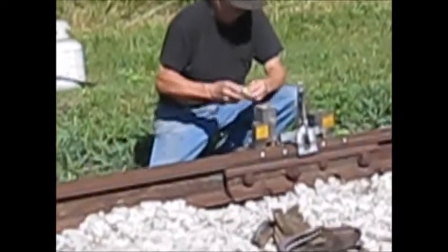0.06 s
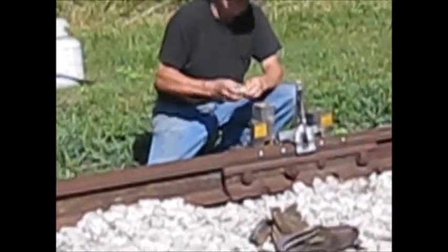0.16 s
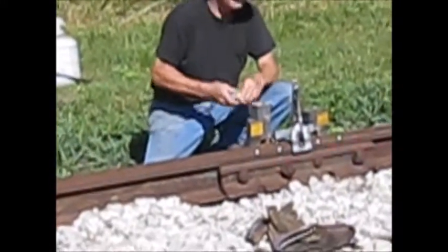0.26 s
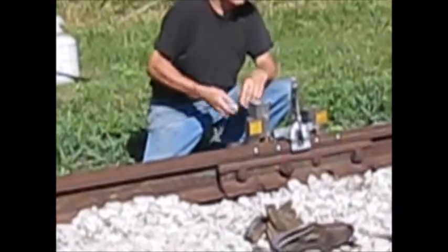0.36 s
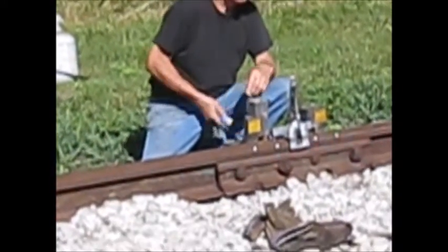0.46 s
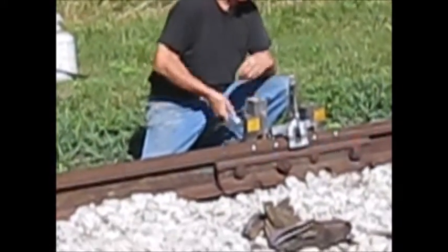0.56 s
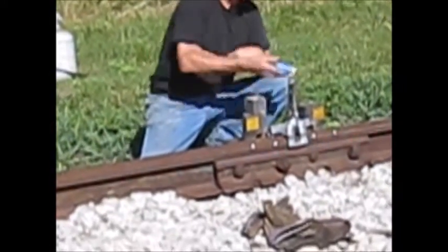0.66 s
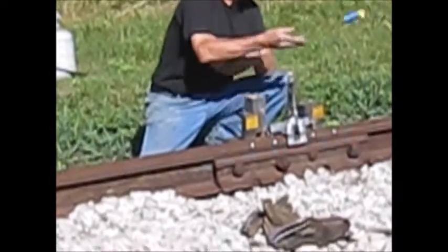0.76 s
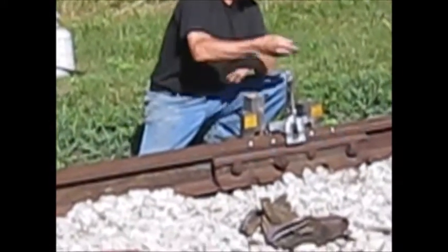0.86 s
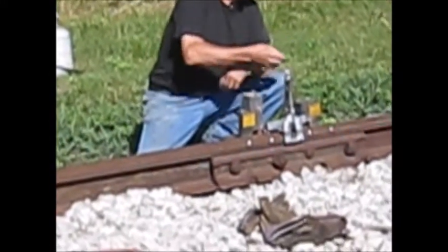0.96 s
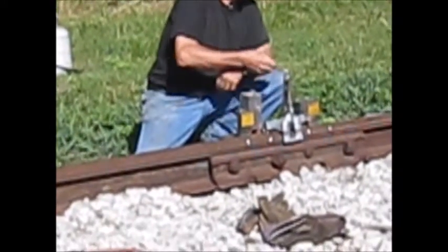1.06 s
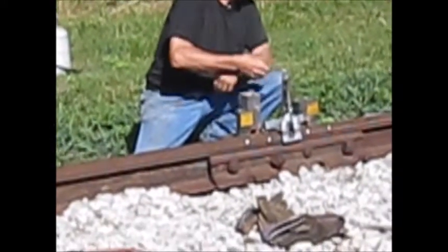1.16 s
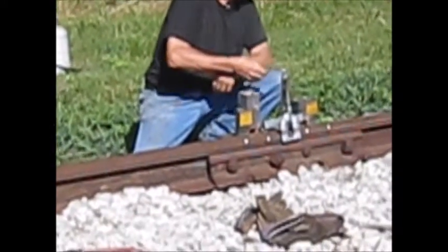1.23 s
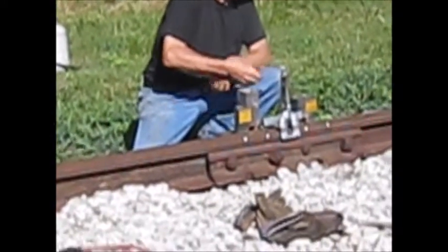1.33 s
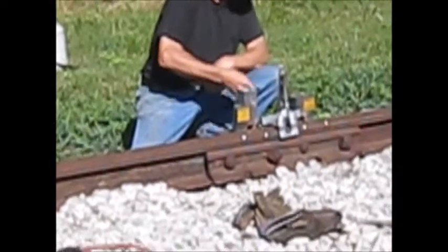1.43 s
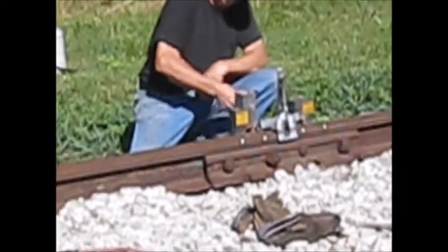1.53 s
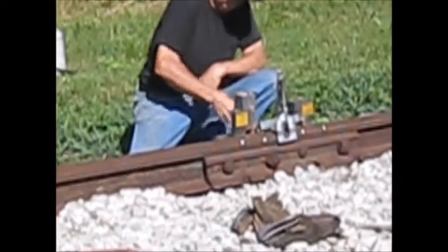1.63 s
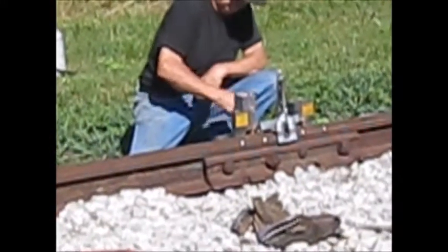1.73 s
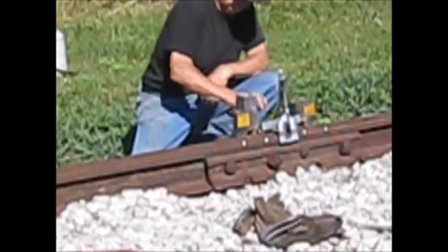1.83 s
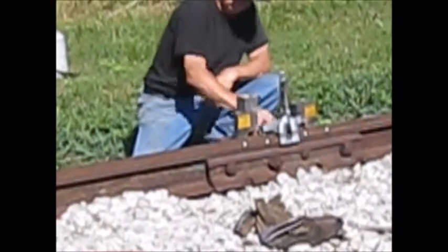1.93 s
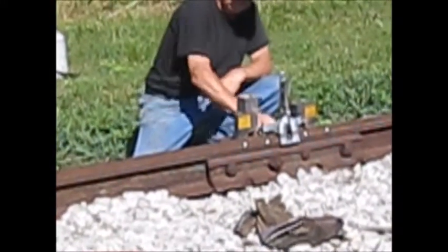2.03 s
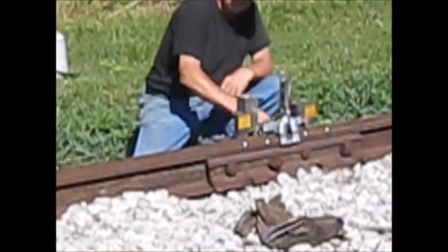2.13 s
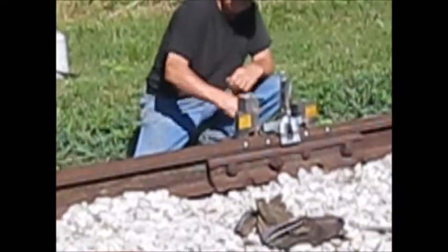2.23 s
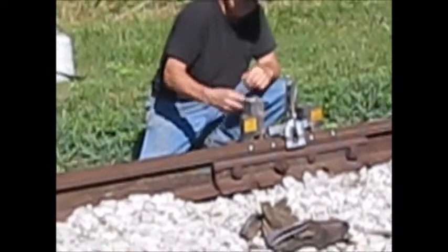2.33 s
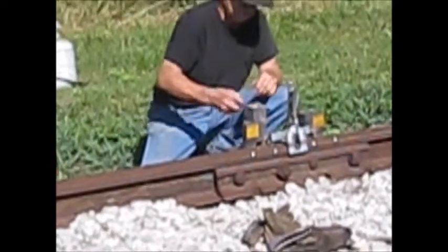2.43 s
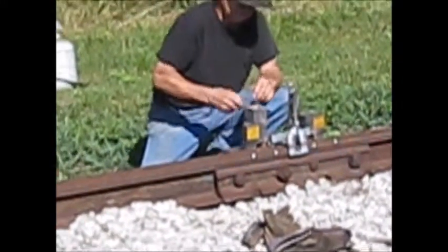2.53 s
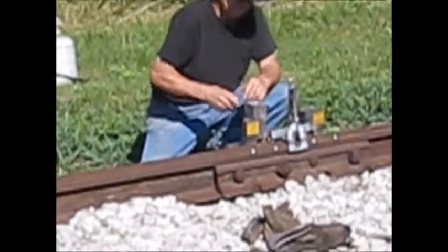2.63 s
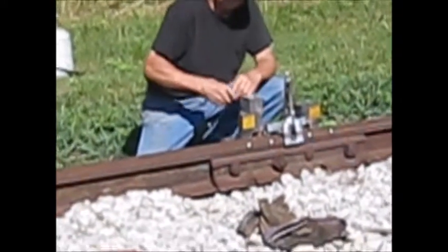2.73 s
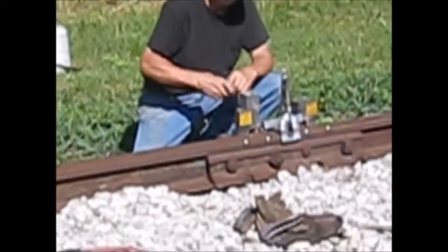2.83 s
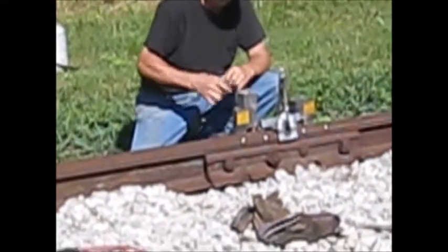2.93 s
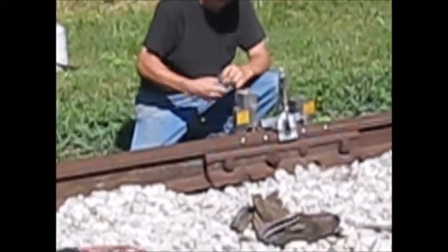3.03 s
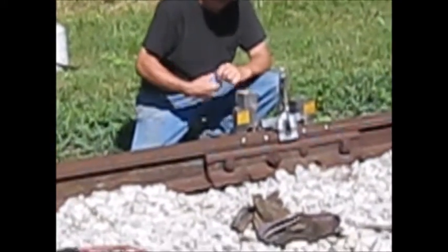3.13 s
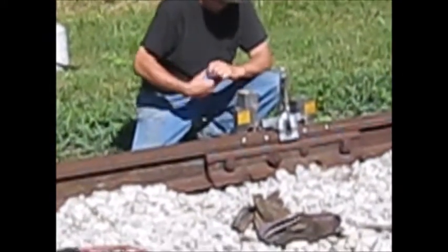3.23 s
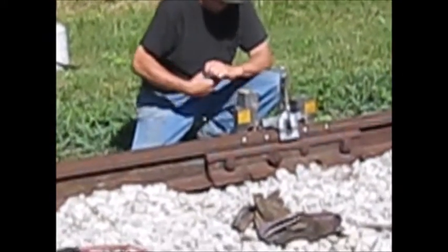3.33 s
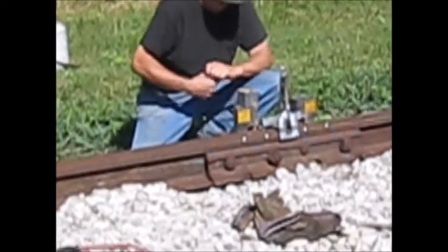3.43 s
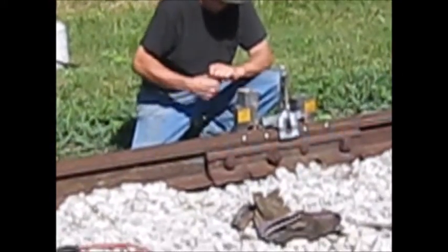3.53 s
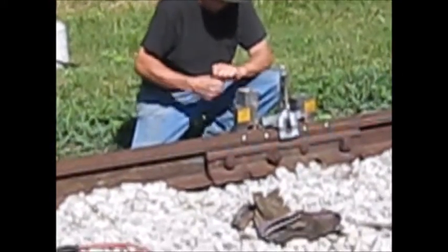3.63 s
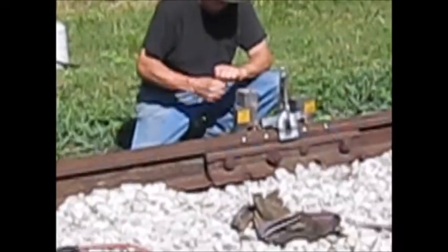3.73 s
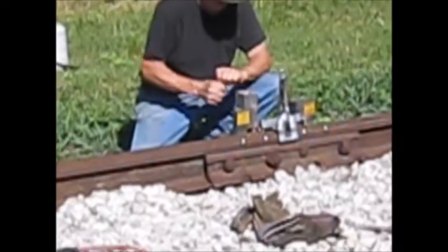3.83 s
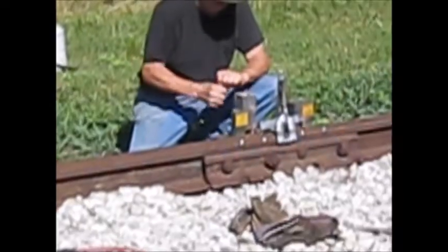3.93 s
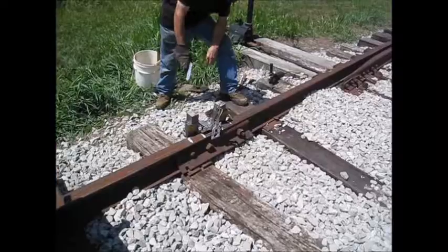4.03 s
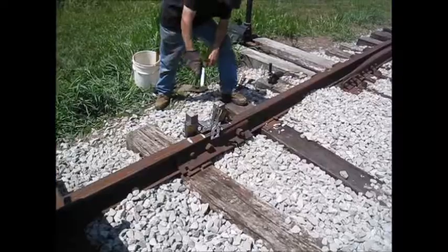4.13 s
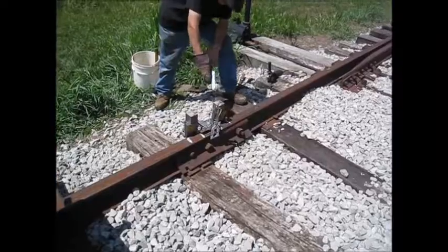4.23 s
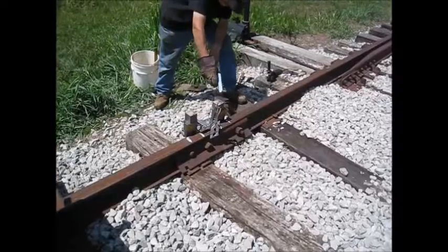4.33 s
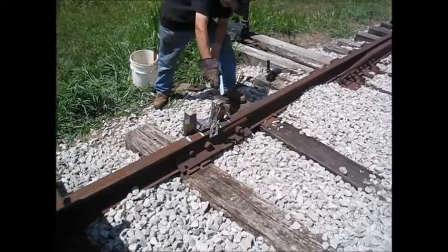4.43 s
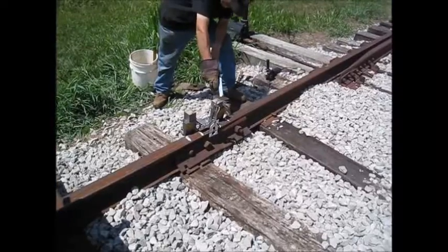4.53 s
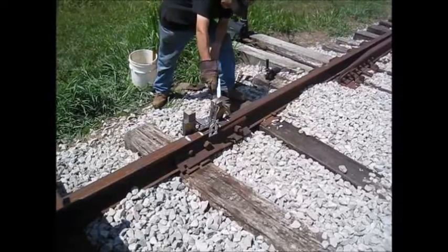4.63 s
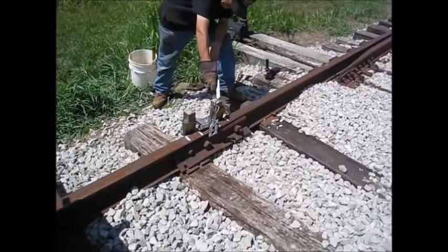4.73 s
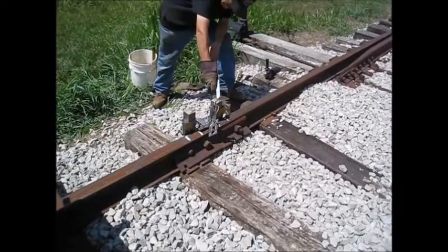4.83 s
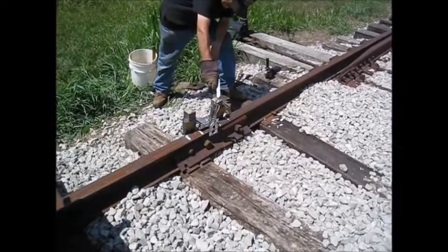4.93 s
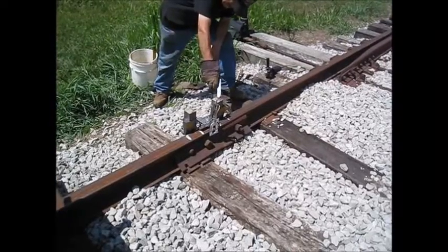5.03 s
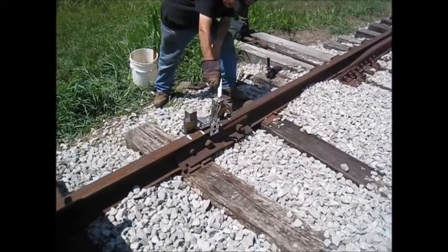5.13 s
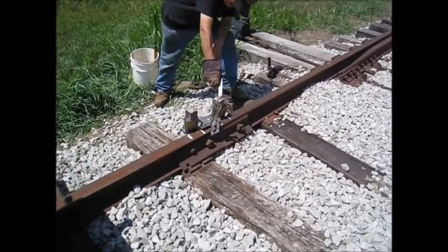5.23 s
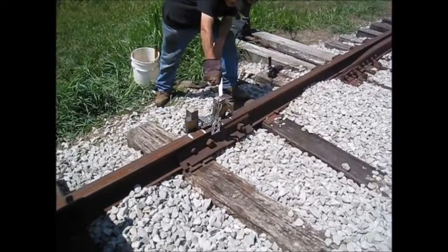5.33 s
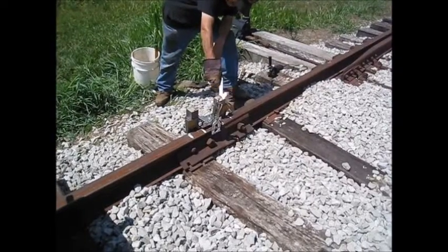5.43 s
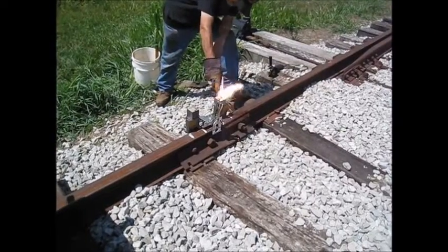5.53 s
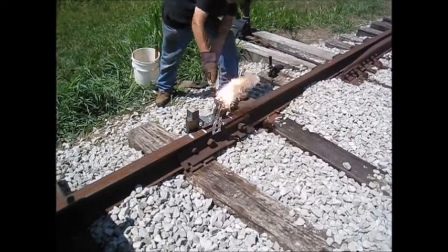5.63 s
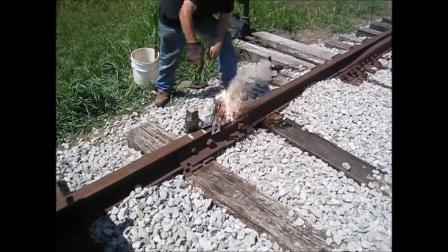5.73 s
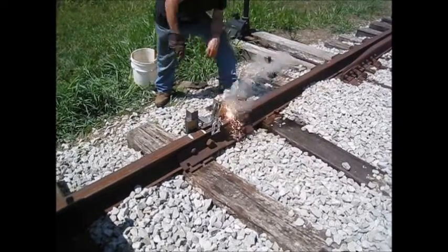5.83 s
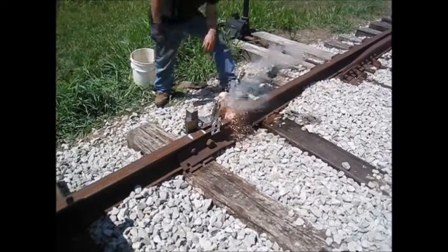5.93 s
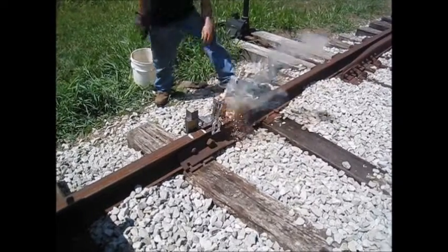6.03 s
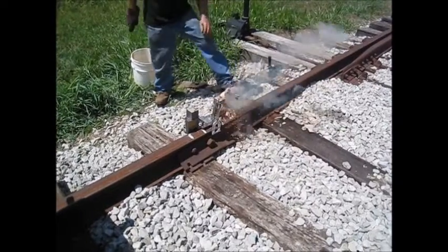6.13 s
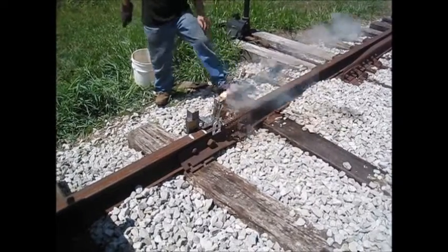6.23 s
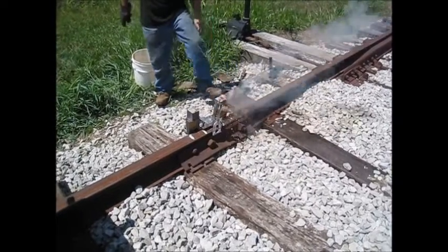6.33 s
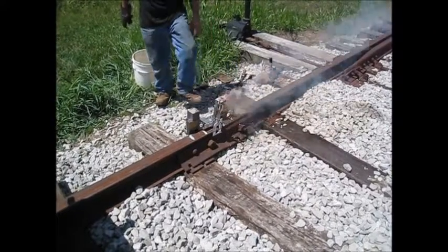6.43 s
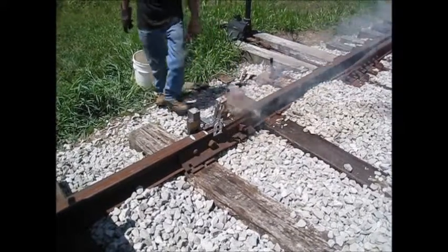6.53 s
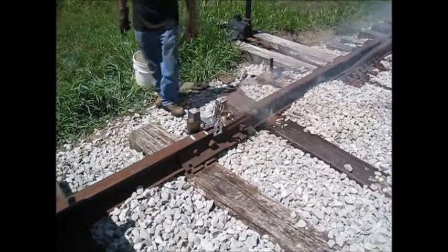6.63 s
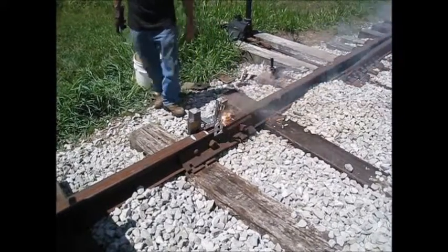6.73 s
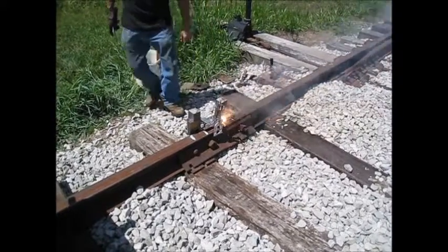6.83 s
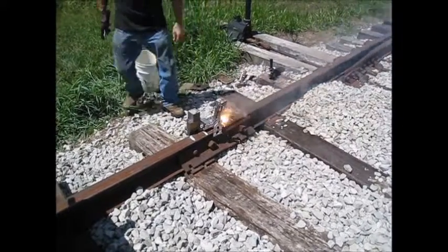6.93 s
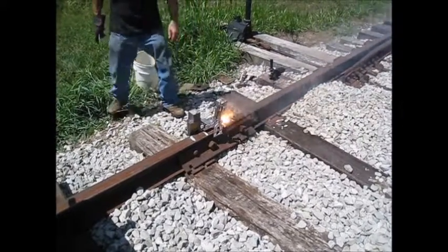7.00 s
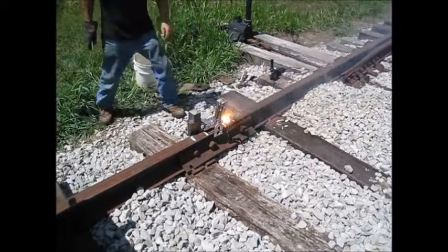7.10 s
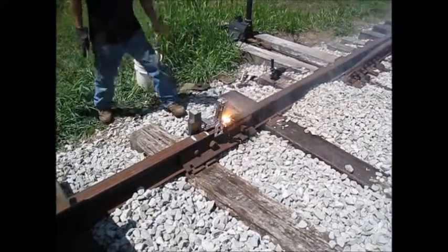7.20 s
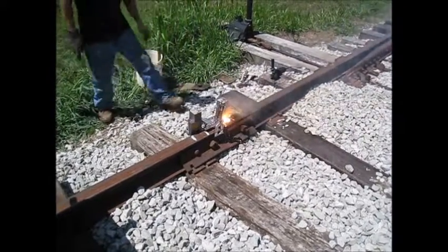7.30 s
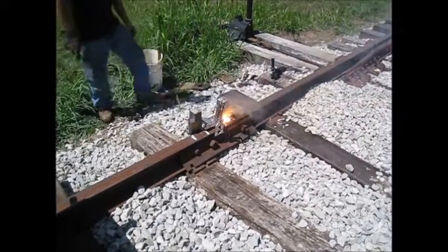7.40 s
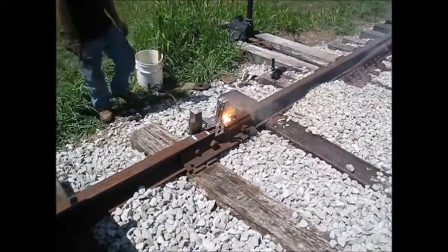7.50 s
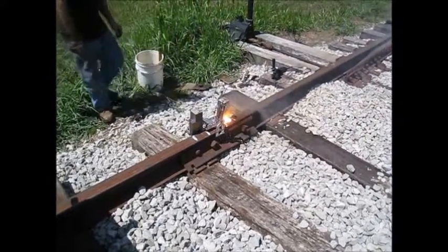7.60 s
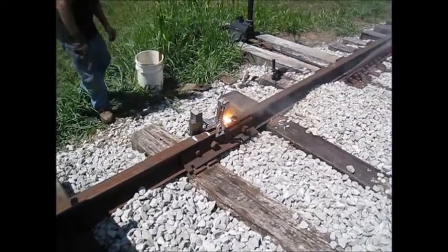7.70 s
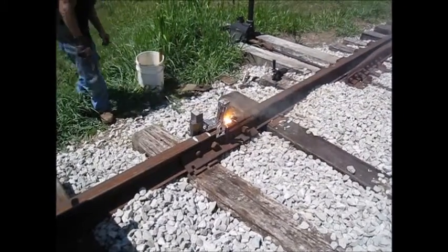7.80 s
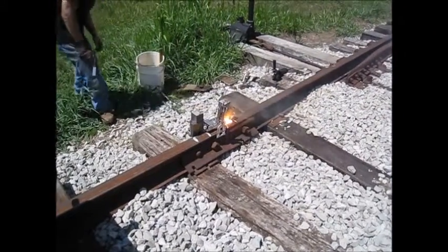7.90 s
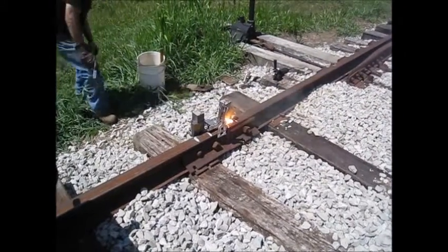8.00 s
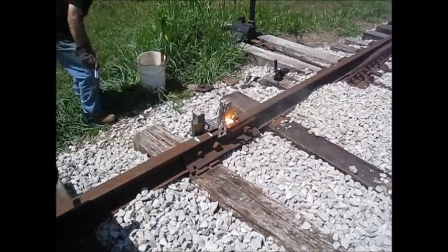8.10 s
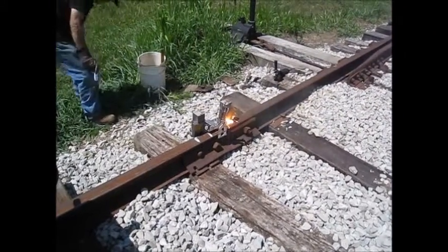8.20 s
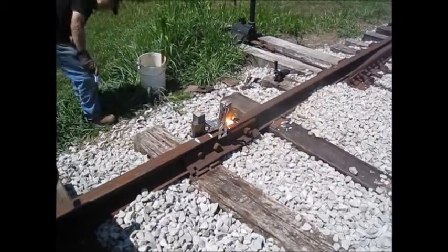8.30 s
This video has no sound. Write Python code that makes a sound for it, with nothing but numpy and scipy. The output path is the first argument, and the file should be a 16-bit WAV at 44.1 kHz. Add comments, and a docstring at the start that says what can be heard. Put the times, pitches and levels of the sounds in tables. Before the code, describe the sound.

For four seconds only a camera's faint motor hum, thin whine, hiss and soft bumps. A tick cuts abruptly to a trackside field with a distant droning engine and raspy insects. A flint igniter snaps four times, the third hardest; powder flares into a loud roaring, fizzing jet for just over a second, pops and stops. Boots clack stones and brush grass. Mono, the loud sounds squashed by the microphone.

```python
"""Thermite charge on a rail

A camera's motor hums, whines and buzzes alone: steady sines over shaped hiss, soft bumps and rumble.
Then the outdoors cuts in with a tick: an engine drones in sine orders, three insects rasp and whistle.
A flint igniter snaps four times in noise bursts with a ringing spring, and the snaps are limited.
Powder in a mould burns for just over a second as roaring, jetting and fizzing noise.
Boots clack ballast stones and brush through grass."""
import sys
import numpy as np
from scipy import signal
from scipy.fft import rfft, irfft
from scipy.io import wavfile
from scipy.ndimage import uniform_filter1d

SR = 44100
rng = np.random.default_rng(int(sys.argv[2]) if len(sys.argv) > 2 else 0)


def transcribe(signal):
    """Save signal, clipped to [-1, 1], as a 16-bit WAV file at the path in sys.argv[1]."""
    frames = np.atleast_2d(signal).T
    limited = np.clip(frames, -1, 1)
    pcm = np.round(limited * 32767).astype(np.int16)
    wavfile.write(sys.argv[1], SR, pcm)


N = 368676
T = np.arange(N) / SR


def undb(db):
    """Decibels to gain."""
    return 10 ** (np.asarray(db) / 20)


def unit(x):
    """Scale to rms 1."""
    return x / np.sqrt(np.mean(x ** 2))


def noise():
    """White noise for the whole length."""
    return rng.standard_normal(N)


def colour(x, points):
    """Shape a spectrum by (frequency [Hz], level [dB]) points, joined on a log-frequency axis; rms 1."""
    hz, db = np.transpose(points)
    bins_hz = np.maximum(np.fft.rfftfreq(len(x), 1 / SR), 1)
    gain = undb(np.interp(np.log(bins_hz), np.log(hz), db))
    return unit(irfft(rfft(x) * gain, len(x)))


def band(x, hz, q):
    """A resonance applied twice, for steep skirts; rms 1."""
    b, a = signal.iirpeak(hz, q, fs=SR)
    once = signal.lfilter(b, a, x)
    return unit(signal.lfilter(b, a, once))


def walk(rate):
    """Slow chance: random levels held 1 / rate s and slewed twice; rms 1."""
    k = max(int(SR / rate), 1)
    held = np.repeat(rng.standard_normal(N // k + 1), k)
    slewed = uniform_filter1d(uniform_filter1d(held, k), k)
    return unit(slewed[:N])


def fade(t, t60):
    """Exponential decay: 60 dB in t60 s, full level before t = 0."""
    return np.exp(-np.log(1000) * np.maximum(t, 0) / t60)


def add(out, s, sound):
    """Mix a sound in at time s."""
    i = int(s * SR)
    out[i:i + len(sound)] += sound[:N - i]


def lines(table, turn):
    """Steady sines at random phases, from (frequency [Hz], level [dB rms]) rows."""
    return sum(undb(db) * np.sqrt(2) * np.sin(2 * np.pi * (hz * turn + rng.random())) for hz, db in table)


# motor hum before its level drops: (frequency [Hz], level [dB rms])
MOTOR_HUM = [(59.6, -46), (119.2, -66.5), (178.8, -60.5), (204, -71.5), (297.9, -73)]
# motor whine: (frequency [Hz], level [dB rms])
MOTOR_WHINE = [(1017.2, -69), (1986.8, -74.5), (2034.5, -71), (2309.5, -73.5), (2980, -77.5),
               (3051.8, -73.5), (4069, -77), (4619, -75), (4967, -75), (5086, -78), (6104, -76.5),
               (6928, -73.5), (7121, -77.5), (8138, -77.5), (8941, -82), (9238, -76), (10172, -80.5),
               (11881, -80.5), (12812, -76), (13114, -81), (13916, -87), (15122, -85)]
# spectrum of the microphone hiss: (frequency [Hz], relative level [dB per Hz])
MIC_HISS = [(53, -9), (90, -6), (248, -21), (922, -26), (1000, -25), (1100, -27), (2000, -29),
            (6550, -33.5), (7140, -29), (7610, -38), (9240, -30), (11000, -43.5), (15500, -33)]
HUM_DROP_S = 4.2  # time when the motor hum drops in level
# the rumble holds, then dies down to a resting level
RUMBLE_DB, RUMBLE_HOLD_S, RUMBLE_T60_S, RUMBLE_REST_DB = -50.5, .3, 0.66, -68.5


def camera(late_hum_db=-7, hiss_db=-55.5, bump_db=-55, bump_t60=0.15):
    """Motor hum and whine share one speed wander; shaped noise gives hiss, drive bumps and a dying rumble."""
    turn = T + np.cumsum(0.000298 * walk(6)) / SR
    hum = lines(MOTOR_HUM, turn) * undb(np.where(T < HUM_DROP_S, 0, late_hum_db))
    whine = lines(MOTOR_WHINE, turn)

    rumble = colour(noise(), [(15, -8), (50, 0), (170, -5), (330, -14), (700, -30), (2000, -55)])
    dying = undb(RUMBLE_DB) * fade(T - RUMBLE_HOLD_S, RUMBLE_T60_S)
    rumble = rumble * (dying + undb(RUMBLE_REST_DB)) * undb(1.8 * walk(22))

    since_bump = (T - .19) % .2515  # s
    bumps = colour(noise(), [(60, -18), (180, -1), (400, -5), (1000, -12), (2500, -37)])
    bumps = bumps * fade(since_bump, bump_t60) * np.minimum(since_bump / 0.0043, 1)
    bumps = bumps * undb(bump_db + 2 * walk(3.6))
    return hum + bumps + rumble + whine + undb(hiss_db) * colour(noise(), MIC_HISS)


BUZZ_HZ = 169.55


def buzz(db=-66, corner_hz=2000, scatter=.25):
    """The small motor's buzz: an even comb of weak partials between the lines of its whine."""
    partials_hz = [BUZZ_HZ * k for k in range(2, 28) if k % 6]
    comb = 0
    for hz in partials_hz:
        phase = scatter * rng.random()  # cycles
        comb = comb + np.sin(2 * np.pi * (hz * T + phase)) / np.hypot(1, hz / corner_hz)
    return undb(db) * unit(comb)


# engine speed before jitter: (time [s], firing rate [per s])
ENGINE_SPEED = [(4.1, 31.14), (5.1, 31.14), (6.8, 31.04), (8.3, 31.04)]
# strongest engine orders before their slight wander: (multiple of firing rate, level [dB rms])
ENGINE_ORDERS = [(2, -77), (6, -59), (10, -57.5), (11, -52), (13, -57), (14, -52), (15, -50), (16, -59),
                 (18, -53.5), (19, -50), (20, -47.5), (21, -51.5), (22, -52.5), (23, -47.5), (24, -60),
                 (25, -45), (26, -49.5), (28, -53), (29, -47), (31, -46.5), (32, -45), (33, -46), (34, -45),
                 (36, -56), (37, -44), (39, -50), (40, -44.5), (41, -44.5), (42, -35.5), (43, -38.5),
                 (45, -47), (47, -45), (48, -51), (49, -43.5), (61, -44), (62, -51)]
# spectrum of the loose clatter: (frequency [Hz], relative level [dB per Hz])
CLATTER_COLOUR = [(60, -45), (110, -28), (200, -15), (350, -11.5), (700, -7.5), (1000, -3), (1300, 0),
                  (1520, 1), (1700, -5), (1900, -4), (2300, -6.5), (2800, -12), (4200, -23), (7000, -34.5)]


def engine(knock_db=-39, clatter_db=-30.5, throb=0.081, jitter=0.00099):
    """A small four-stroke some way off: exhaust orders, a valve knock repeated each cycle, loose clatter."""
    speed = np.interp(T, *np.transpose(ENGINE_SPEED)) * (1 + jitter * walk(14))
    cycle = np.cumsum(speed) / SR
    # distance and echoes scatter the phases, so the firings blur into a drone
    tones = 0
    for order, db in ENGINE_ORDERS:
        tone = np.sqrt(2) * np.sin(2 * np.pi * (order * cycle + rng.random()))
        tones = tones + undb(db + 0.14 * walk(7)) * tone

    grain = rng.standard_normal(int(SR / ENGINE_SPEED[0][1]))
    one_cycle = colour(grain, [(1400, -25), (1850, 0.5), (2300, 2.5), (2900, -6), (5000, -25.5)])
    knock = np.interp(cycle % 1, np.linspace(0, 1, len(one_cycle)), one_cycle)

    clatter = colour(noise(), CLATTER_COLOUR) * undb(0.67 * walk(25))
    clatter = clatter * (1 + throb * np.cos(2 * np.pi * cycle))
    return tones + undb(knock_db) * knock + undb(clatter_db) * clatter


def insect(rate, hz, drop_hz, width_hz, db, duty):
    """Each wing stroke is a short rasping whistle that falls in pitch."""
    stroke = np.cumsum(rate * (1 + 0.031 * walk(12))) / SR % 1
    along = np.minimum(stroke / duty, 1)
    pitch = hz + drop_hz * (.5 - along) + width_hz * walk(1500)
    song = np.sin(np.pi * along) * np.sin(2 * np.pi * np.cumsum(pitch) / SR)
    return unit(song) * undb(db + 2.6 * walk(15))


# spectrum of the open air: (frequency [Hz], relative level [dB per Hz])
FIELD_AIR = [(2500, -13), (4000, 0), (5000, 0.5), (6000, 2.5), (6800, 0.5), (7800, 4.5), (8800, -2.5),
             (9800, -8), (12000, -6.5), (15500, -12)]


def meadow(air_db=-39.0):
    """Three insects over the even hiss of the field."""
    near = insect(rate=53.5, hz=7510, drop_hz=840, width_hz=170, db=-43.5, duty=1.0)
    second = insect(rate=22.0, hz=8200, drop_hz=607, width_hz=310, db=-49, duty=0.97)
    third = insect(rate=18.7, hz=9100, drop_hz=104, width_hz=140, db=-56.0, duty=0.38)
    return near + second + third + undb(air_db) * colour(noise(), FIELD_AIR)


def knocks(table, q, rise_s):
    """Short blows, each dying away in one broad resonance."""
    out, t = np.zeros(N), T[:SR // 3]
    for s, db, hz, t60 in table:
        shape = fade(t - rise_s, t60) * np.minimum(t / rise_s, 1)
        blow = band(rng.standard_normal(len(t)), hz, q) * shape
        # give every blow the energy of its envelope, whatever the noise draw
        level = np.sqrt(np.sum(shape ** 2) / np.sum(blow ** 2))
        add(out, s, undb(db) * blow * level)
    return out


# sharp small knocks, the cut's tick first: (time [s], level [dB], resonance [Hz], t60 [s])
SHARP_KNOCKS = [(4.0247, -18.5, 2420, 0.0055), (6.715, -27, 3600, 0.057), (6.956, -20, 3520, 0.012),
                (7.097, -28, 3500, .025), (7.315, -20, 4160, 0.023), (7.326, -22.5, 3900, .025),
                (7.444, -24.5, 5000, 0.018), (7.462, -26, 4800, .02), (7.5122, -8, 4270, 0.008)]
# short tick as the outdoor sound cuts in, same columns
CUT_TICK = SHARP_KNOCKS[:1]


def cut_tick():
    """A very short noise blow in one broad resonance."""
    return knocks(CUT_TICK, q=1.4, rise_s=.0002)


# soft low thumps: (time [s], level [dB], resonance [Hz], t60 [s])
LOW_THUMPS = [(5.078, -34.5, 119, 0.14), (5.152, -38, 90, 0.13), (5.328, -25, 160, .04),
              (5.47, -32.5, 110, 0.15), (5.603, -29.5, 167, 0.1), (5.98, -38, 109, .25),
              (6.46, -40, 150, .12), (6.697, -41, 110, .12), (7.285, -38, 100, .14)]


def thumps():
    """Low noise blows with a soft onset and one broad resonance each."""
    return knocks(LOW_THUMPS, q=0.97, rise_s=0.0031)


# igniter snaps: (time [s], level [dB], scrape length [s], t60 [s],
#                 ring frequency [Hz], relative ring level [dB], relative spring level [dB])
FLINT_SNAPS = [(5.101, -4, 0.00058, 0.015, 13400, -4.5, -44), (5.2314, -6, 0.00078, 0.025, 2830, -9.5, -22),
               (5.3276, 5, 0.0037, 0.027, 7200, -6.5, -14.5), (5.4736, -4, 0.00098, 0.039, 4840, -5.5, -22)]
# spectrum of the scrape: (frequency [Hz], relative level [dB per Hz])
FLINT_COLOUR = [(60, -5), (250, -13), (600, -7), (1200, -10), (2000, -4), (3000, 3.5), (4200, -1.5),
                (9000, -1.5), (11000, 1.5), (14000, 1.5), (16000, 5)]
# modes of the steel spring: (frequency [Hz], relative level [dB], t60 [s])
SPRING_MODES = [(2560, 3, 0.11), (2660, -8, .06), (6067, -16, 0.22), (7440, -17.5, 0.066), (8400, -16, .06),
                (10200, -18, .2), (11940, -17, 0.2)]
SNAP_TAIL_S = .1  # t60 of the ballast's scatter


def igniter(tail_db=-20):
    """Flint scrapes steel for up to a few milliseconds; the spring rings and the ballast scatters the snap."""
    out, t = np.zeros(N), T[:SR // 4]
    spring = sum(undb(db) * np.sin(2 * np.pi * hz * t) * fade(t, t60) for hz, db, t60 in SPRING_MODES)
    for s, db, scrape, t60, hz, ring_db, spring_db in FLINT_SNAPS:
        grit, ring = rng.standard_normal((2, len(t)))
        rasp = colour(grit, FLINT_COLOUR) + undb(ring_db) * band(ring, hz, q=2.5)
        shape = fade(t - scrape, t60) + undb(tail_db) * fade(t, SNAP_TAIL_S)
        add(out, s, undb(db) * (unit(rasp) * shape + undb(spring_db) * spring))
    return out


def sparks(per_s, spread_db):
    """Random grains at a mean rate, a few much larger than the rest; rms 1."""
    size = undb(spread_db * np.minimum(rng.exponential(size=N), 5))
    struck = rng.random(N) < per_s / SR
    return unit(struck * size * noise())


def flare(start, rise, end, sag_db_per_s, t60):
    """Envelope of one flare: it builds, sags steadily (or grows, if negative), then dies away."""
    attack = np.clip((T - start) / rise, 0, 1)
    sag = undb(-sag_db_per_s * np.maximum(T - start - rise, 0))
    return attack * sag * fade(T - end, t60)


def flutter(x, depth_db, rate):
    """Turbulence: overlapping bands, two thirds of an octave apart, swell and sink on their own."""
    bins_hz = np.maximum(np.fft.rfftfreq(N, 1 / SR), 1)
    place = np.clip(np.log2(bins_hz / 600) * 1.5, 0, 7)
    spectrum = rfft(x)
    out = 0
    for k in range(8):
        part = irfft(spectrum * np.maximum(1 - abs(place - k), 0), N)
        out = out + part * undb(depth_db * walk(rate))
    return out


# flares (two puffs of starting powder, the main charge, a surge, the last flare), before sag and sputter:
# (start time [s], jet and fizz rise [s], end time [s], roar level [dB], jet level [dB], fizz level [dB])
POWDER_FLARES = [(5.385, 0.034, 5.47, -33, -33.5, -30), (5.51, .02, 5.535, -31, -32.5, -30.5),
                 (5.53, 0.14, 6.6, -23, -22, -27), (6.0, 0.046, 6.12, -23.5, -34, -50),
                 (6.48, .06, 6.61, -24.5, -26, -33)]
# spectra of the three voices: (frequency [Hz], relative level [dB per Hz])
ROAR_COLOUR = [(100, -24), (300, -21.5), (600, -7.5), (1000, -1), (1350, 3.5), (1700, -4.5), (2000, 3.5),
               (2400, -13.5), (3200, -11), (6000, -46)]
JET_COLOUR = [(1600, -28), (2500, 4), (3300, 1), (4000, 2.5), (4500, 0.5), (4950, -0.5), (5400, -13),
              (7000, -21.5)]
FIZZ_COLOUR = [(3500, -28), (5400, 2), (7000, -1.5), (8500, -0.5), (10000, -3.5), (12000, -1),
               (14000, -9.5), (15500, -16)]
# jet and sparks weaken as the powder is spent, while the roar slowly grows
JET_SAG_DB_PER_S, FIZZ_SAG_DB_PER_S, ROAR_GROWTH_DB_PER_S = 9, 8.5, 1.5
ROAR_T60_S, SPRAY_T60_S = .25, 0.57
ROAR_RISE_SHARE = 0.82  # the roar builds in this share of a flare's rise
SPENT_S, SPENT_T60_S = 6.662, .07  # powder used up, flame cut off


def burn(sputter_db=0.62, crackle=0.45, whistle_db=-10, whistle_end_s=6.15):
    """Gas roars in the crucible and jets through the lid's slot, half whistling at first; sparks fizz."""
    flares = []
    for start, rise, end, roar_db, jet_db, fizz_db in POWDER_FLARES:
        roar = flare(start, ROAR_RISE_SHARE * rise, end, -ROAR_GROWTH_DB_PER_S, ROAR_T60_S)
        jet = flare(start, rise, end, JET_SAG_DB_PER_S, SPRAY_T60_S)
        fizz = flare(start, rise, end, FIZZ_SAG_DB_PER_S, SPRAY_T60_S)
        flares.append((undb(roar_db) * roar, undb(jet_db) * jet, undb(fizz_db) * fizz))
    roar, jet, fizz = np.sqrt(np.sum(np.square(flares), axis=0))  # overlapping flares add in power

    gas = roar * colour(noise() + crackle * sparks(700, 2.6), ROAR_COLOUR)
    whistle = undb(whistle_db) * band(noise(), hz=4860, q=35)
    whistle = whistle * np.clip((whistle_end_s - T) / 0.15, 0, 1)
    slot = colour(noise() + crackle * sparks(1000, 3.1), JET_COLOUR) + whistle
    spray = fizz * colour(noise() + crackle * sparks(3000, 3), FIZZ_COLOUR)
    flame = flutter(gas + jet * slot + spray, depth_db=1.5, rate=55)
    return flame * undb(sputter_db * walk(90)) * fade(T - SPENT_S, SPENT_T60_S)


# pop from the mould: (time [s], level [dB], resonance [Hz], t60 [s])
MOULD_POPS = [(6.4658, -2.5, 1500, 0.009)]


def pops():
    """A sharp noise blow from the mould in one broad resonance."""
    return knocks(MOULD_POPS, q=0.72, rise_s=0.0002)


# ballast stones underfoot: (time [s], level [dB], resonance [Hz], t60 [s])
BALLAST_STONES = SHARP_KNOCKS[1:]
# legs swishing through grass: (middle time [s], length [s], level before grass gain [dB])
GRASS_SWISHES = [(6.75, .16, -46), (6.96, .16, -45), (7.128, .22, -40.5), (7.33, .14, -40),
                 (7.73, 0.45, -39.5), (8.044, 0.53, -40)]


def boots(grass_db=-1):
    """Stones clack underfoot, and the grass rustle swells and sinks with each swing of a leg."""
    blades = colour(sparks(2500, 1.7), [(1500, -13.5), (3500, -1), (6000, -10), (10500, -1), (15000, -13)])
    brushing = 0
    for s, length, db in GRASS_SWISHES:
        swing = np.cos(np.pi * np.clip((T - s) / length, -.5, .5)) ** 2
        brushing = brushing + undb(grass_db + db) * swing
    return knocks(BALLAST_STONES, q=1.4, rise_s=.0002) + brushing * blades


CUT_S = 4.019


def scene():
    """The outdoor sound cuts in over the camera's own hum; one microphone feeds both channels."""
    outdoors = engine() + meadow() + cut_tick() + thumps() + igniter() + burn() + pops() + boots()
    cut_in = np.clip((T - CUT_S) / 0.00069, 0, 1)
    mono = camera() + buzz() + outdoors * cut_in
    return np.array([mono, mono])


def lag(x, seconds):
    """One-pole smoothing."""
    pole = np.exp(-1 / (seconds * SR))
    return signal.lfilter([1 - pole], [1, -pole], x)


TOP_HZ = 15400


def record(dry, threshold_db=-13, detect_s=0.0019, attack_s=0.0019, hold_s=0.013, release_db_per_s=210):
    """A limiter ducks loud sound, holds and recovers steadily; remaining peaks clip and the top is cut."""
    level_db = 10 * np.log10(lag(dry[0] ** 2, detect_s) + 1e-12)
    over_db = np.maximum(level_db - threshold_db, 0)
    # a running maximum on a tilted line gives a straight release in dB
    duck_db = np.maximum.accumulate(over_db + release_db_per_s * T) - release_db_per_s * T
    held_db = np.maximum(duck_db, np.interp(T - hold_s, T, duck_db))
    duck_db = lag(held_db, attack_s)
    limited = np.clip(dry * undb(-duck_db), -.64, .64)
    top_cut = signal.ellip(10, .2, 80, TOP_HZ, fs=SR, output="sos")
    return signal.sosfilt(top_cut, limited)


dry = scene()
out = record(dry)
transcribe(out)
```